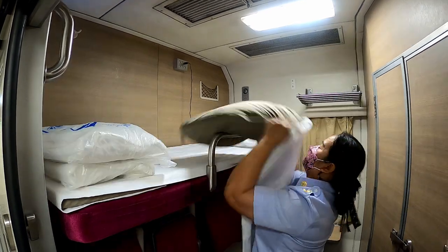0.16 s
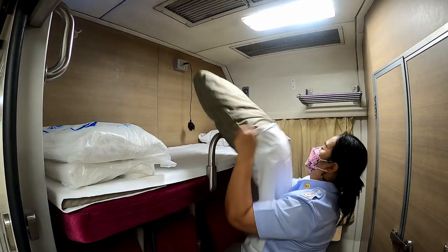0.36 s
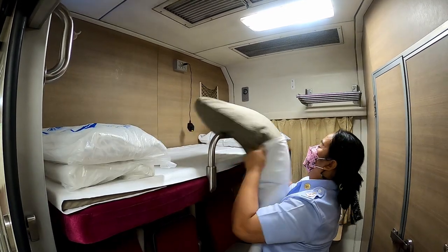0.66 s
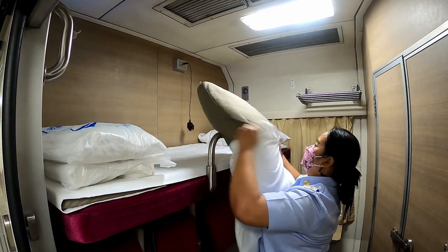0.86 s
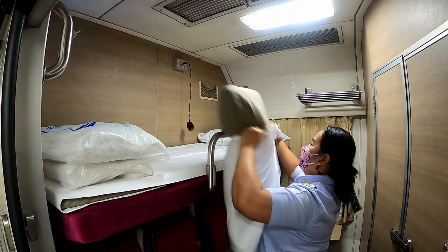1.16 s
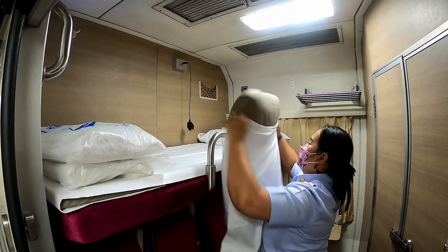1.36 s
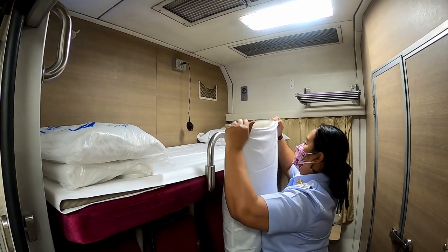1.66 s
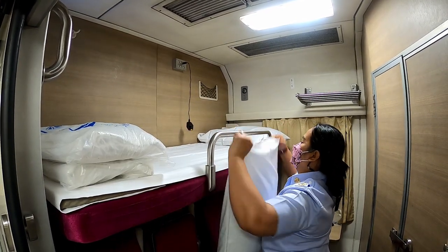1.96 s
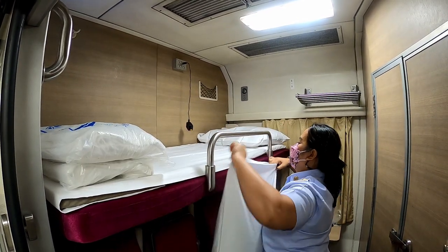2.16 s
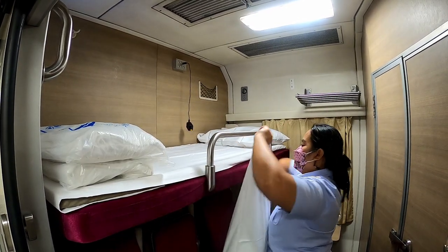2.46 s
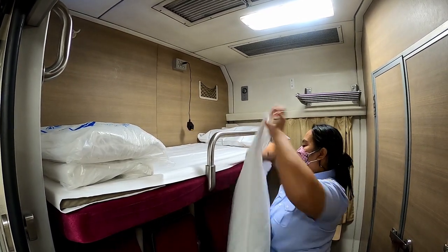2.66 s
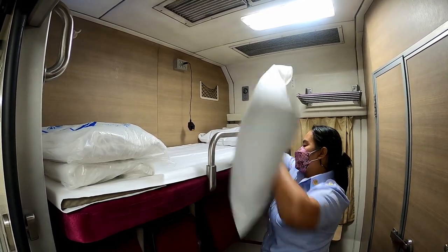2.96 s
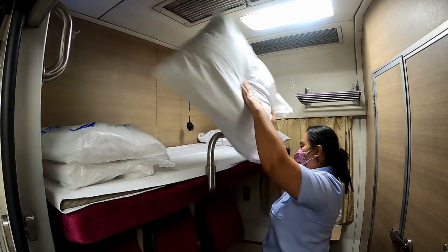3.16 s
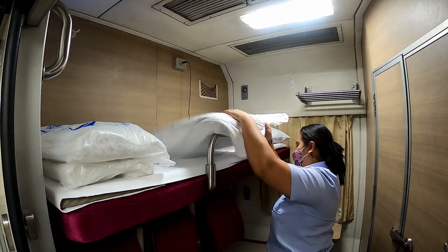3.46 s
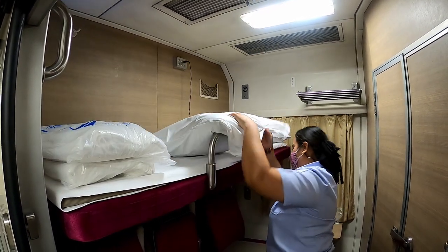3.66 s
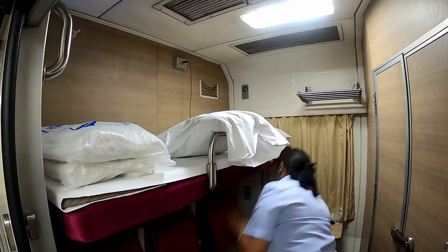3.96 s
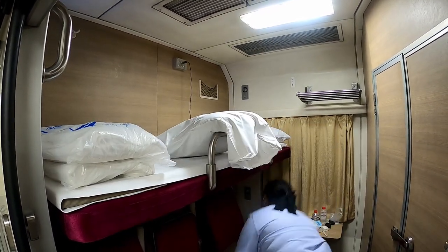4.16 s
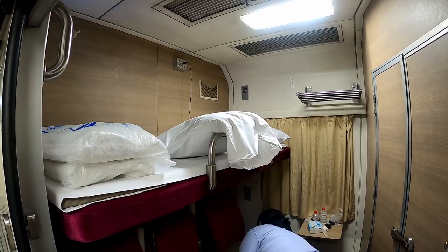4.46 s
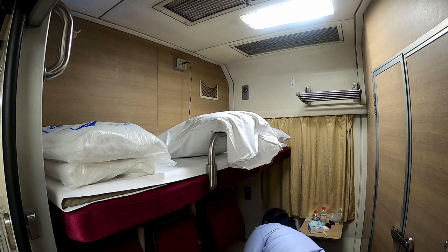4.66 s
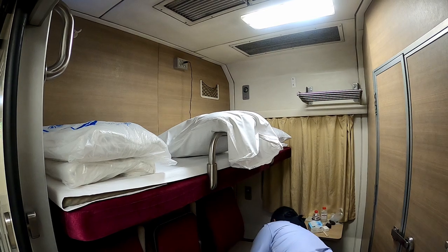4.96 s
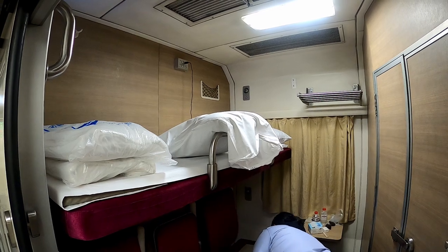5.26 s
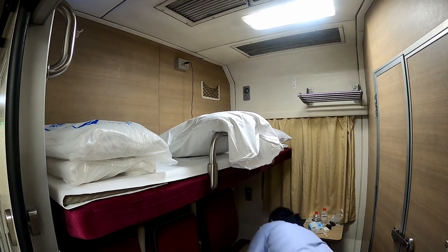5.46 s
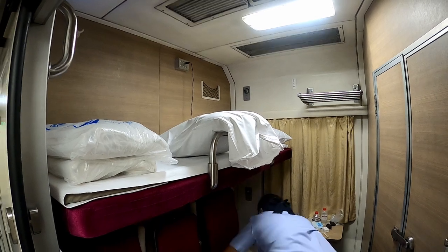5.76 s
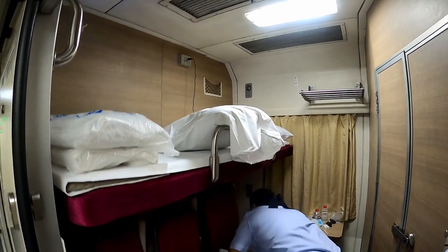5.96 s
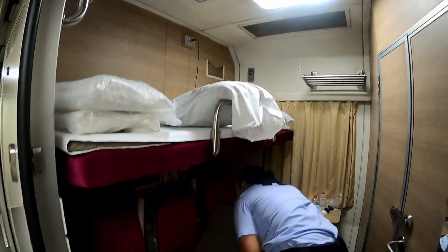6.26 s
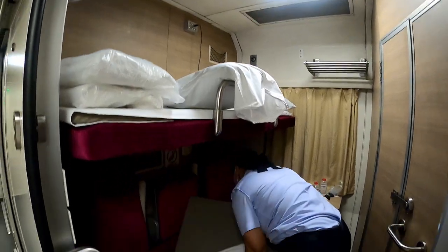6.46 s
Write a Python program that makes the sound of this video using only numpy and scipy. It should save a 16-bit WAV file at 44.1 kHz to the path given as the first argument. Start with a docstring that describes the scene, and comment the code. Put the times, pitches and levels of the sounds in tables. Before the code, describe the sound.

A pillow is shaken down into its cotton case with rustles and slaps, then a berth fitting clicks, bumps and squeaks over a low train hum.

```python
"""A pillow is shaken down into its cotton case, turned over and dropped on the upper bunk of a small sleeper cabin.
Then upholstery creaks and a fitting at the lower berth is unlatched, dragged and bumped while clothes rustle.
Cloth is coloured stick-slip crackle; blows ring damped modes; the squeaks are rising chirps.
The standing train hums and its ventilation blows as filtered noise, with short echoes from the cabin walls.
Two close microphone ports by the door share the bass and differ in the treble."""
import sys
import numpy as np
from scipy import signal
from scipy.fft import rfft, irfft, next_fast_len
from scipy.io import wavfile
from scipy.ndimage import uniform_filter1d

SR = 44100
rng = np.random.default_rng(int(sys.argv[2]) if len(sys.argv) > 2 else 0)


def generate_wav(sig):
    """Save sig (samples, or channels by samples) to the path in sys.argv[1] as 16-bit PCM at SR."""
    pcm = np.round(np.clip(np.atleast_2d(sig).T, -1, 1) * 32767).astype(np.int16)
    wavfile.write(sys.argv[1], SR, pcm)


N = 290883
T = np.arange(N) / SR  # seconds

# spectrum of slapping and crinkling cotton: (frequency [Hz], relative level per Hz [dB])
SLAP_SPECTRUM = [(150, -11.5), (500, 4.5), (800, 1), (1250, -0.5), (1600, -8.5), (2400, -12.5),
                 (4000, -19.5), (8000, -32.5), (15000, -57)]


def undb(db):
    """Decibels to gain."""
    return 10 ** (np.asarray(db) / 20)


def unit(x):
    """Scale to rms 1."""
    return x / np.sqrt(np.mean(x ** 2))


def decay(age, t60):
    """Exponential fall by 60 dB in t60 seconds."""
    return np.exp(-np.log(1000) * age / t60)


def curve(rows):
    """Gain over time from (time [s], level [dB]) rows, silent outside them."""
    s, db = np.transpose(rows)
    return undb(np.interp(T, s, db, left=-np.inf, right=-np.inf))


def colour(x, spectrum):
    """Give a sound a spectrum, silent outside its table, at rms 1."""
    hz, db = np.transpose(spectrum)
    size = next_fast_len(N, True)
    bins = np.maximum(np.fft.rfftfreq(size, 1 / SR), 1)
    gain = undb(np.interp(np.log(bins), np.log(hz), db, left=-np.inf, right=-np.inf))
    return unit(irfft(rfft(x, size) * gain, size)[..., :N])


def walk(rate):
    """Smooth chance with a spread near 1, changing rate times a second."""
    hold = max(int(SR / rate), 1)
    steps = np.repeat(rng.standard_normal(N // hold + 1), hold)
    return unit(uniform_filter1d(steps, hold)[:N])


def slips(rate, spread_db):
    """Tiny stick-slip releases, rate a second on average; a positive spread makes a few much larger."""
    size = undb(spread_db * np.minimum(rng.exponential(size=N), 4))
    return (rng.random(N) < rate / SR) * rng.choice([-1, 1], N) * size


def ports(three, split_hz=3000, slope=1.39, lag_s=3.4e-5):
    """Two close ports share one sound in the bass, a little later at the left; each has its own treble."""
    size = next_fast_len(N, True)
    hz = np.maximum(np.fft.rfftfreq(size, 1 / SR), 1)
    apart = 1 / (1 + (split_hz / hz) ** slope)  # share of power that is separate
    delay = np.exp(-2j * np.pi * hz * np.array([[lag_s], [0]]))
    bins = rfft(three, size)
    shared = bins[0] * delay * np.sqrt(1 - apart)
    return irfft(shared + bins[1:] * np.sqrt(apart), size)[:, :N]


def grain(spectrum, rate, spread_db):
    """A coloured crackle, spread over the two ports, at rms 1."""
    return colour(ports([slips(rate, spread_db) for _ in range(3)]), spectrum)


def burst(s, rise, t60):
    """Envelope that climbs from time s and then dies away."""
    age, rise = np.maximum(T - s, 0), max(rise, 1 / SR)
    return np.minimum(age / rise, 1) * decay(np.maximum(age - rise, 0), t60)


def rub(s, length, attack, t60):
    """Envelope of a sliding movement: it gathers speed and dies away once its length has passed."""
    age = np.maximum(T - s, 0)
    return np.minimum(age / max(attack, 1 / SR), 1) * decay(np.maximum(age - length, 0), t60)


def ring(hz, t60):
    """One second of a damped mode; it builds up over half a cycle."""
    t = T[:SR]
    return np.minimum(2 * hz * t, 1) * np.sin(2 * np.pi * hz * t) * decay(t, t60)


def thud(s, centre_hz, modes, reach):
    """A blow wakes the modes mostly within reach (in log frequency) of its centre."""
    sound = sum(undb(db) * np.exp(-(np.log(hz / centre_hz) / reach) ** 2) * ring(hz, t60)
                for hz, db, t60 in modes)
    return np.pad(sound, (int(s * SR), N))[:N]


def push(s, contact):
    """A smooth blow of unit area; a longer contact holds less treble."""
    force = np.sin(np.pi * np.clip((T - s) / contact, 0, 1)) ** 2
    return force / force.sum()


def pan(db):
    """Left and right gains for a level difference, left minus right."""
    return undb(np.array([[db], [-db]]) / 2)


def rustle():
    """Threads catch and slip in each stroke; long strokes swell slowly; passing folds flutter and crinkle."""
    # cloth over cloth (case, pillow, sleeves): (start [s], length [s], relative friction level [dB])
    strokes = [(0, 0.27, -54), (0.072, 0.033, -44.5), (0.279, 0.13, -44.5), (0.435, 0.33, -54.5),
               (0.742, .07, -49.5), (0.791, 0.08, -44), (0.912, 0.07, -41), (1.028, 0.088, -40),
               (1.167, 0.081, -41.5), (1.29, 0.077, -40.5), (1.427, 0.061, -43), (1.523, 0.1, -46.5),
               (1.623, 0.34, -47), (1.966, 0.18, -56.5), (2.134, 0.12, -49), (2.496, 0.23, -53.5),
               (2.738, 0.08, -58.5), (2.977, 0.48, -55.5), (3.445, 0.15, -51.5), (3.655, 0.08, -57),
               (3.723, 0.11, -52.5), (3.93, 0.33, -65), (4.291, 0.028, -54.5), (4.467, 0.075, -58),
               (5.58, 0.048, -55.5), (5.838, 0.051, -55.5), (6.073, 0.48, -60)]
    # rubbed cotton: (frequency [Hz], relative level per Hz [dB])
    cotton = [(300, -10.5), (600, -6.5), (840, -12), (1310, -3.5), (1700, -8), (2900, -8.5), (4100, -10.5),
              (7400, -23), (8560, -22.5), (10000, -30.5), (12700, -33), (15500, -50)]
    # pillow along the inside of the tight case: (start [s], length [s], level [dB])
    slides = [(1.182, 0.054, -35.5), (1.72, 0.16, -50.5)]
    # hollow rasp of those slides: (frequency [Hz], relative level per Hz [dB])
    hollow = [(750, -16), (1270, 0), (1800, -26)]
    # the swell takes 23 ms plus a share of the stroke's length; overlapping strokes add as power
    power = sum((undb(db) * rub(s, length, attack=0.023 + 0.14 * length, t60=0.22)) ** 2
                for s, length, db in strokes)
    flutter = undb(4.0 + 1.17 * walk(60))
    friction = grain(cotton, rate=12000, spread_db=2.0) * flutter
    crinkle = undb(-5) * grain(SLAP_SPECTRUM, rate=160, spread_db=3.5)
    sliding = sum(undb(db) * rub(s, length, attack=.03, t60=0.18) for s, length, db in slides)
    rasp = sliding * grain(hollow, rate=500, spread_db=-0.5)
    return (friction + crinkle) * np.sqrt(power) + rasp


def train():
    """Ventilation noise under a slightly unsteady machine hum."""
    # ventilation: (frequency [Hz], relative level per Hz [dB])
    vent = [(15, 2), (30, -2.5), (60, -4), (120, -3), (160, -10), (270, -9), (450, -19), (1000, -24.5),
            (2000, -31.5), (2900, -33), (6000, -40.5), (8900, -45.5), (12500, -57.5), (15500, -72)]
    # hum of the train: (frequency [Hz], middle rms level [dB])
    hum_tones = [(48.4, -45), (199.2, -52), (301.5, -58)]
    vent_db = -42
    air = colour(ports(rng.standard_normal((3, N))), vent) * undb(vent_db + 0.1 * walk(4.2))
    hum = np.zeros(N)
    for hz, db in hum_tones:
        level = undb(db + 1.53 * walk(11)) * np.sqrt(2)
        hum += level * np.sin(2 * np.pi * hz * T + 0.59 * walk(7))
    return air + hum


def wafts():
    """The moving pillow or body pushes air, which sets the small cabin booming softly."""
    # pushes of air: (time [s], relative level [dB])
    air_pushes = [(0.323, -28.5), (0.659, -26.5), (1.223, -24.5), (1.466, -24.5), (3.563, -23.5),
                  (3.681, -36), (4.306, -35.5)]
    air = sum(undb(db) * push(s, contact=0.0019) for s, db in air_pushes)
    boom = ring(hz=35.4, t60=0.53)
    boom = boom + undb(-1.0) * ring(hz=84.6, t60=0.15) + undb(-2) * ring(hz=125.6, t60=0.11)
    return undb(3.5) * signal.fftconvolve(air, boom)[:N]


def flaps():
    """Cloth snaps taut or the pillow lands: a crackling slap and a hollow thump of the filled case."""
    # jerks: (time [s], relative slap level [dB], relative body level [dB], t60 [s])
    jerks = [(.845, -36, -41, 0.6), (0.909, -25.5, -20, 0.41), (1.037, -36.5, -34, 0.17),
             (1.098, -34, -33, 0.22), (1.185, -37, -37.5, 0.3), (1.226, -30, -31, 0.25),
             (1.312, -27.5, -37, 0.12), (1.362, -39, -32.5, 0.4), (1.464, -29, -25.5, 0.13),
             (1.481, -28, -34, 0.083), (1.585, -32.5, -37, 0.089), (2.333, -39.5, -57, 0.1),
             (2.643, -45.5, -62, .14), (3.001, -42.5, -43.5, 0.099), (3.079, -39, -43, 0.084),
             (3.562, -26.5, -30.5, 0.097)]
    # filled case: (frequency [Hz], relative level per Hz [dB])
    case_spectrum = [(55, -23), (118, 4), (150, -5), (310, -0.5), (440, -17), (540, -11), (1200, -33)]
    slap, body = np.zeros((2, N))
    for s, slap_db, body_db, t60 in jerks:
        jerk = burst(s, rise=0.0034, t60=t60)
        slap += undb(slap_db) * jerk
        body += undb(body_db) * jerk
    slap_sound = undb(.5) * slap * grain(SLAP_SPECTRUM, rate=1200, spread_db=3.0)
    return slap_sound + undb(3.0) * body * grain(case_spectrum, rate=2900, spread_db=0.5)


def pats():
    """The pillow's weight meets case bottom or bunk: a short hollow thump and a crack of tight cotton."""
    # hits: (time [s], relative thump level [dB], centre of the modes woken [Hz], crack level [dB])
    hits = [(.912, -10.5, 310, -29.5), (0.928, -9.5, 149, -38), (.957, -15, 198, -43),
            (1.044, -35, 260, -37), (1.229, -24, 224, -50), (1.474, -27, 190, -58), (3.564, -14, 180, -33)]
    # modes of the pillow and the air around it: (frequency [Hz], relative level [dB], t60 [s])
    pillow_modes = [(127, -2.5, .16), (201.7, 0.5, 0.13), (277, -3, 0.1), (364, 0, 0.076), (526, 8.5, 0.15)]
    # tight cotton: (frequency [Hz], relative level per Hz [dB])
    crack_spectrum = [(900, -7), (2100, 1), (3100, -2.5), (14000, -37.5)]
    thumps = sum(undb(db) * thud(s, hz, pillow_modes, reach=.36) for s, db, hz, _ in hits)
    crack = sum(undb(db) * burst(s, rise=0.0026, t60=0.12) for s, _, _, db in hits)
    return thumps + crack * grain(crack_spectrum, rate=1800, spread_db=5.5)


def creak(jitter=0.076):
    """Uneven stick-slip pulses in the upholstery as it is gripped."""
    # course of the grip: (time [s], middle slip rate [1/s], level [dB])
    grip = [(4.498, 320, -35), (4.52, 376, -28.5), (4.545, 170, -41), (4.565, 177, -36.5),
            (4.59, 264, -41.5), (4.62, 220, -48)]
    # upholstery: (frequency [Hz], relative level per Hz [dB])
    upholstery = [(100, 20.5), (340, 0.5), (680, -9.5), (1000, -22), (1700, -19.5), (6000, -55)]
    s, rate, db = np.transpose(grip)
    turns = np.cumsum(np.interp(T, s, rate) * (1 + jitter * walk(200))) / SR
    # one pulse at each whole turn
    pulses = np.diff(np.floor(turns), prepend=0) * undb(1.9 * walk(270))
    return colour(pulses, upholstery) * curve(np.column_stack([s, db]))


def catch():
    """The fitting's catch: short dry clacks that ring the metal, each with a bright tick on top."""
    # clicks: (time [s], relative level [dB], treble level [dB], t60 [s], centre of the modes woken [Hz])
    clicks = [(4.72, -27.5, -55, 0.058, 1800), (4.773, -34, -38, 0.1, 3200),
              (4.815, -39.5, -47, 0.24, 3000), (5.849, -44.5, -54, 0.065, 1880)]
    # clack, then tick: (frequency [Hz], relative level per Hz [dB])
    clack_spectrum = [(200, -13), (1200, 2), (1700, -2.5), (3200, -1), (6500, -19), (13000, -65)]
    tick_spectrum = [(1500, -20), (4000, 5), (8000, -8), (12000, -22), (15000, -32)]
    # ringing metal: (frequency [Hz], relative level [dB], t60 [s])
    metal_modes = [(1104, 2, 0.095), (1355, 3, 0.081), (2010, -18, 0.11), (2550, -3, 0.12),
                   (3260, 0, 0.045)]
    clack = sum(undb(db) * burst(s, 0.0011, t60) for s, db, _, t60, _ in clicks)
    tick = sum(undb(db) * burst(s, 0.0006, t60) for s, _, db, t60, _ in clicks)
    metal = sum(undb(db) * thud(s, hz, metal_modes, reach=0.6) for s, db, _, _, hz in clicks)
    clack_sound = clack * grain(clack_spectrum, rate=5000, spread_db=4.5)
    tick_sound = tick * grain(tick_spectrum, rate=21000, spread_db=-4.0)
    return clack_sound + tick_sound + undb(-4.5) * metal


def fitting():
    """Bumps ring the panel and rattle its loose joints; the drag scrapes dully, squeaks and skids briefly."""
    # bumps: (time [s], thud level [dB], centre of the modes woken [Hz], rattle level [dB]), all levels relative
    bumps = [(4.836, -10, 172, -27), (4.863, -12.5, 670, -23.5), (4.884, -8.5, 123, -37),
             (4.931, -23, 350, -43), (5.03, -23, 1100, -24), (5.047, -15, 302, -28.5),
             (5.061, -19, 55.3, -34), (5.32, -16.5, 32, -28.5), (5.337, -11, 121, -26.5),
             (5.351, -18.5, 250, -31.5), (5.369, -10.5, 98, -25), (5.397, -11.5, 59.4, -58),
             (5.637, -36.5, 1036, -48)]
    # modes of the fitting and its panel: (frequency [Hz], relative level [dB], t60 [s])
    panel_modes = [(30.3, -1.5, 0.99), (59.7, 0.5, 0.47), (112.8, -1, 0.172), (176.3, 0.5, 0.102),
                   (298.2, -4.5, 0.19), (567, -6, 0.094), (766, -2.5, 0.032), (1062, -3, 0.086),
                   (1320, -12.5, 0.1), (1690, -13, 0.063), (2370, -24, 0.065), (3110, -17, 0.025)]
    # loose joints, dull scrape, bright skid: (frequency [Hz], relative level per Hz [dB])
    rattle_spectrum = [(120, -19.5), (280, -5), (459, -14), (560, -10), (1090, -14.5), (3230, -22),
                       (4300, -31), (12700, -62.5), (15000, -76)]
    scrape_spectrum = [(150, -7.5), (292, -2), (450, -12), (1250, -12.5), (1650, -21.5), (3200, -22.5),
                       (14500, -58)]
    skid_spectrum = [(6500, -35), (8200, 2.5), (10000, -7), (12800, 0), (13400, -8), (14000, -33)]
    thuds = sum(undb(db) * thud(s, hz, panel_modes, reach=0.444) for s, db, hz, _ in bumps)
    shake = sum(undb(db) * burst(s, rise=0.0022, t60=0.12) for s, _, _, db in bumps)
    # the sliding catches and lets go
    drag = rub(4.84, length=0.498, attack=0.023, t60=0.21) * undb(-37.0 + 2.0 * walk(70))
    # neighbouring modes have opposite polarity
    modes = sum((-1) ** k * undb(db) * ring(hz, t60) for k, (hz, db, t60) in enumerate(panel_modes))
    judder = unit(slips(rate=400, spread_db=2.5)) * (drag + undb(3.0) * shake)
    panel = signal.fftconvolve(judder, modes / np.linalg.norm(modes))[:N]
    rattle = grain(rattle_spectrum, rate=810, spread_db=0.6) * undb(2.5) * shake
    scrape = grain(scrape_spectrum, rate=900, spread_db=0.5) * undb(3.5) * drag
    rumble = grain([(20, -11), (70, 2.5), (125, -8), (200, -19)], rate=2400, spread_db=0.0) * drag
    skid = grain(skid_spectrum, rate=9300, spread_db=-3.0) * burst(4.908, rise=0.019, t60=0.15)
    return thuds + panel + rattle + scrape + undb(6) * rumble + squeak() + undb(-47.5) * skid


def squeak(waver=.15, rough=1.07, octaves_per_s=7.9):
    """Each brief grip of the sliding fitting gives a rough chirp that climbs in pitch."""
    # chirps: (start [s], length [s], middle starting pitch [Hz], relative peak level [dB])
    chirps = [(5.127, 0.028, 1300, -36), (5.152, .026, 1187, -27), (5.165, 0.027, 1450, -33),
              (5.186, 0.019, 1240, -28), (5.199, 0.013, 1750, -29), (5.204, 0.011, 1120, -31)]
    out, unsteady = np.zeros(N), 1 + waver * walk(400)
    for s, length, hz, db in chirps:
        age = np.clip(T - s, 0, length)
        turns = np.cumsum(hz * 2 ** (octaves_per_s * age) * unsteady) / SR
        out += undb(db) * np.sin(np.pi * age / length) * np.sin(2 * np.pi * turns)
    return out * (1 + rough * walk(600))


def cabin(x, t60=0.28, wet_db=-8, low_hz=220):
    """Close walls answer after 3 ms with echoes thin in the bass; the bedding soon soaks them up."""
    t = T[:SR // 2]
    tails = rng.standard_normal((3, len(t))) * decay(t, t60) * (t > .003)
    tails = tails[0] + 0.3 * tails[1:]  # the ports hear nearly the same echoes
    tails /= np.linalg.norm(tails, axis=1, keepdims=True)
    tails = signal.sosfilt(signal.butter(2, low_hz, "high", fs=SR, output="sos"), tails)
    return x + undb(wet_db) * signal.fftconvolve(x, tails, axes=1)[:, :N]


def scene():
    """All handling sounds in the cabin, over the train."""
    cloth = pan(-1.8) * (rustle() + flaps())
    bedding = cloth + pan(-0.7) * pats() + wafts()
    berth = creak() + pan(-0.6) * (catch() + fitting())
    return cabin(bedding + berth) + train()


def record(dry):
    """Each microphone port adds its own colour; the top is cut above 15.7 kHz."""
    # difference between the ports: (frequency [Hz], left minus right [dB])
    port_tilt = [(100, 1.2), (700, 1.5), (1300, 1), (2300, 3), (4400, 2), (8000, 0), (13000, -2.5)]
    hz, db = np.transpose(port_tilt)
    bins = np.maximum(np.fft.rfftfreq(N, 1 / SR), 1)
    tilt = np.interp(np.log(bins), np.log(hz), db) * np.array([[.5], [-.5]])
    tilted = irfft(rfft(dry) * undb(tilt), N)
    return signal.sosfilt(signal.ellip(8, .2, 70, 15700, fs=SR, output="sos"), tilted)


dry = scene()
out = record(dry)
generate_wav(out)
```